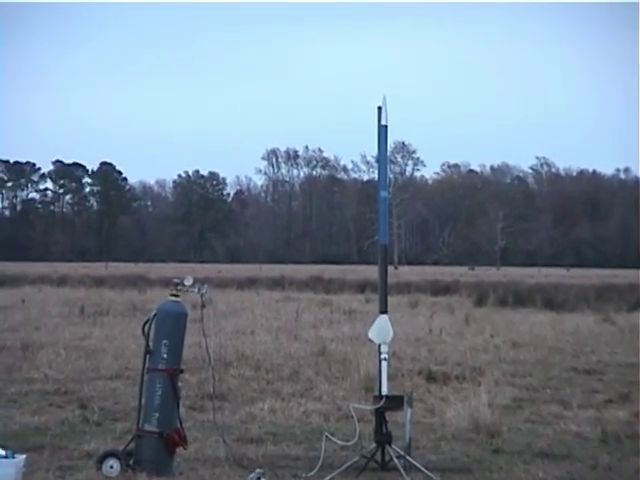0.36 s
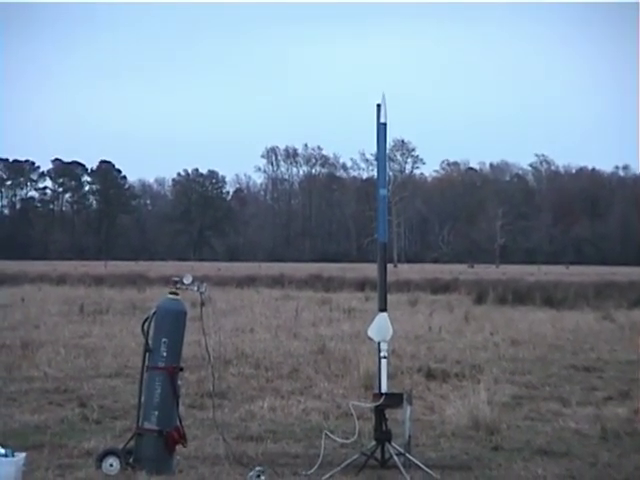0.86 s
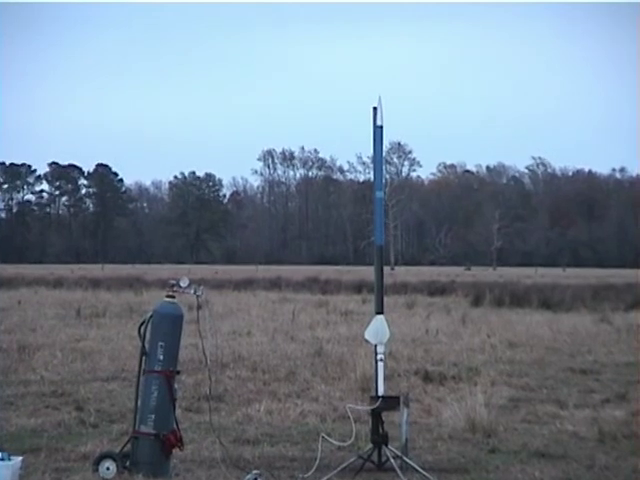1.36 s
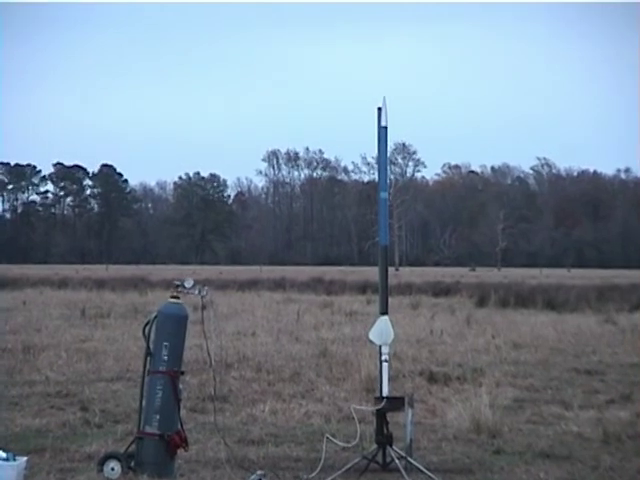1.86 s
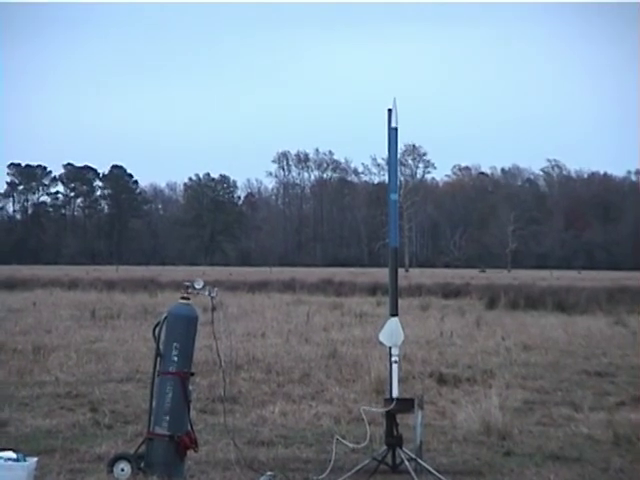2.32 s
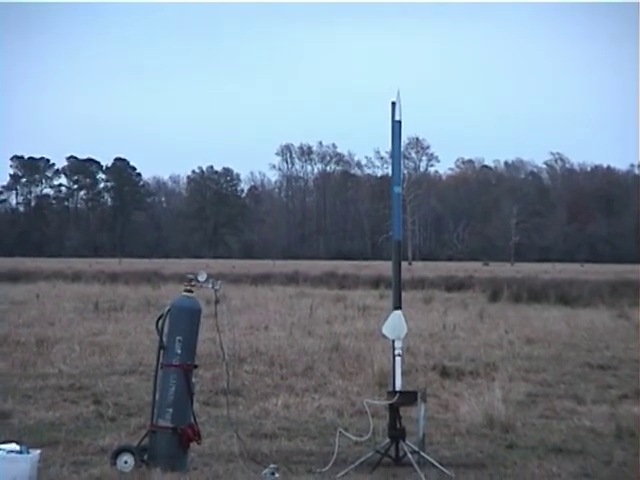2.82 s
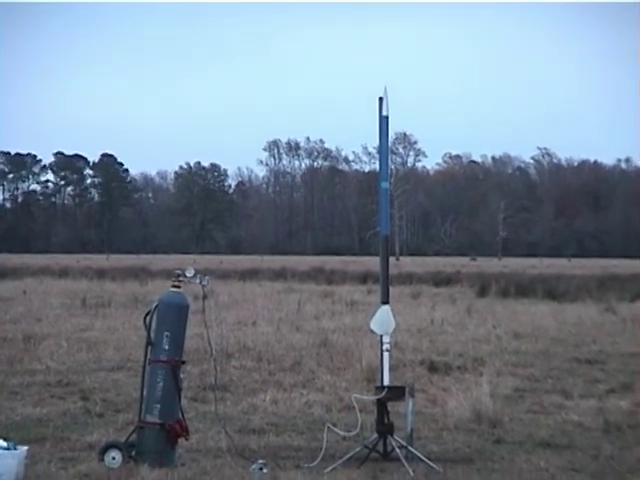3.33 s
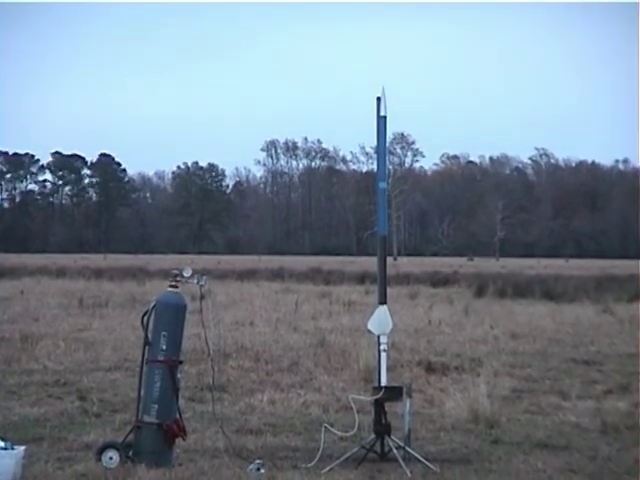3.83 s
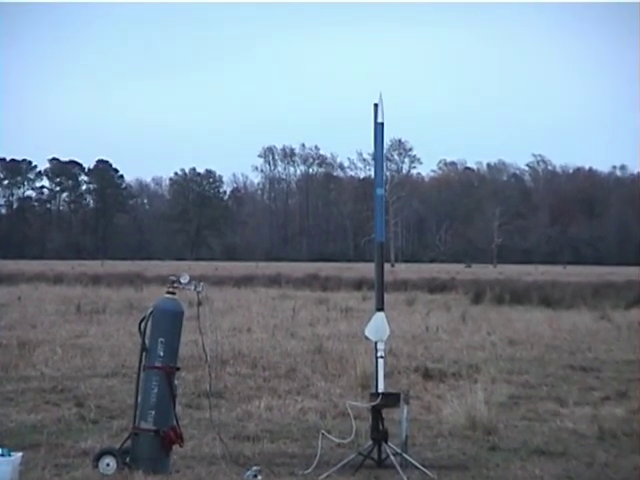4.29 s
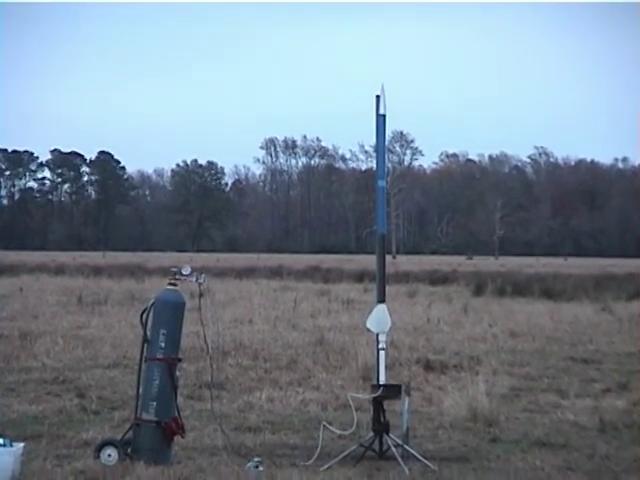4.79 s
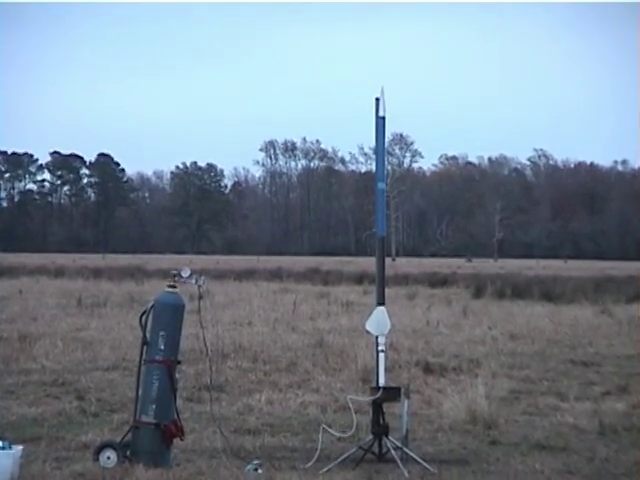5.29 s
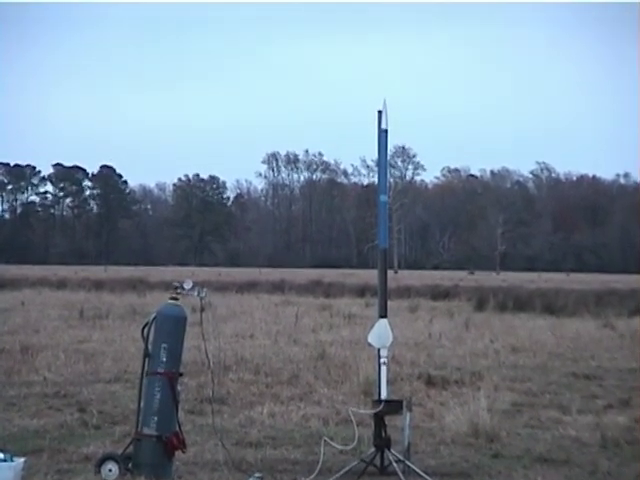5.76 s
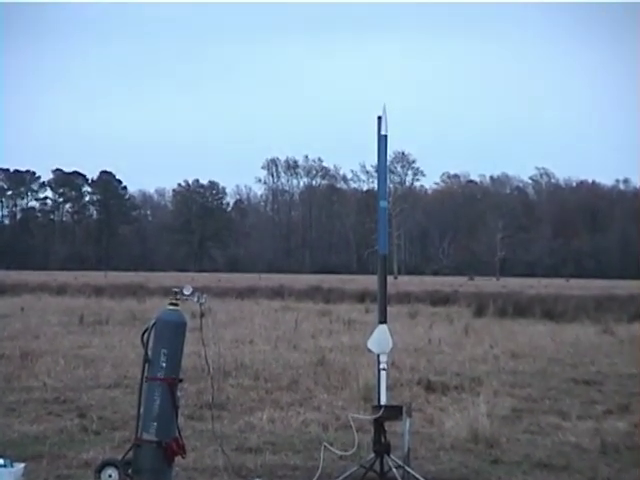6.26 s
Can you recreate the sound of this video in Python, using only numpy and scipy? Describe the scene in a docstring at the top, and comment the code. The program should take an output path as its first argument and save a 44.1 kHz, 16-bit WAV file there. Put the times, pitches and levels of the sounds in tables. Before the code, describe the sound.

From 0 s a steady, bright hiss of gas venting fills an open field, airy and concentrated in the high treble, with little echo. Beneath it lie low outdoor rumble, a faint distant hum and the camera's constant motor whirr and thin whine. A soft wind puff bumps the microphone around 0.7 s, with lesser ones later. From about 1.4 s a resonant sheen gathers at the top of the hiss and narrows. A small creak sounds at 1.9 s, then a cluster of short dull clicks from 2.7 to 3.2 s, strongest near 3 s. A trembling, extremely high whistle emerges from 2.6 s, swells to its peak near 4.2 s, then steadies, fades partly and slides slowly lower. The hiss dips slightly midway and strengthens through the end at 6.4 s, where faint creaks and a wind puff return.

```python
"""Gas vents from a thin rocket being filled in an open field, over low rumble, a faint hum and light wind.
Camera motor whine and whirr run throughout, as filtered noise and sines; its body creaks as decaying modes.
The jet hiss is shaped noise. A vent resonance slides down from 14.8 kHz, narrowing around 2.8 s;
a trembling whistle swells out of it from 2.6 s, peaks near 4.2 s and goes on falling in pitch."""
import sys
import numpy as np
from scipy import signal
from scipy.fft import rfft, irfft, next_fast_len
from scipy.io import wavfile
from scipy.ndimage import uniform_filter1d, map_coordinates

SR = 44100
rng = np.random.default_rng(int(sys.argv[2]) if len(sys.argv) > 2 else 0)


def invert_db(x):
    """Field ratio 10**(x/20) for x, a level in decibels (scalar or array-like)."""
    u = np.asarray(x, float) / 20
    return 10 ** u


def wrap_up_sound(samples):
    """Save the sound to the file named by the first command line argument, as 16-bit audio."""
    columns = np.atleast_2d(samples).T
    # keep every value between -1 and 1, then stretch to whole-number steps
    tamed = np.clip(columns, -1, 1)
    steps = np.round(tamed * 32767).astype(np.int16)
    wavfile.write(sys.argv[1], SR, steps)


N = 281881
PORTS = np.array([[1], [-1]])  # left and right microphone port in opposite polarity


def along(points, hz):
    """Reads (Hz, value) points on a log frequency axis."""
    f, v = np.transpose(points)
    return np.interp(np.log(hz + 1), np.log(f + 1), v)


def change(t, middle_s, span_s, before, after):
    """A smooth (logistic) passage from one value to another."""
    return before + (after - before) / (1 + np.exp((middle_s - t) / span_s))


def wobble(knots_per_s):
    """A smooth random curve through normally distributed knots."""
    knots = rng.standard_normal(int(N * knots_per_s / SR) + 4)
    return map_coordinates(knots, [np.arange(N) * knots_per_s / SR])


def noise(gain, patchy_db, size=1024):
    """Noise of density gain(Hz, s) per root Hz, in random patches of time and frequency."""
    hz, s, z = signal.stft(rng.standard_normal(N + size), SR, nperseg=size)
    field = uniform_filter1d(rng.standard_normal(z.shape), 9, 0)
    field = uniform_filter1d(field, 8, 1)
    z = z * invert_db(patchy_db * field / field.std())
    z = z * gain(hz[:, None], s[None]) * np.sqrt(SR / 2)
    return signal.istft(z, SR, nperseg=size)[1][:N]


def bell(hz, centre_hz, width_hz):
    """Resonance curve: 1 at its centre, 1/2 at half the width to either side."""
    return 1 / (1 + (2 * (hz - centre_hz) / width_hz) ** 2)


def dip(hz, centre_hz, width_hz, depth_db):
    """Gain of a cancellation of the given depth."""
    return invert_db(depth_db * bell(hz, centre_hz, width_hz))


def rumble():
    """Low outdoor rumble common to both ports, with a faint wavering hum from far off."""
    # rumble density: (frequency [Hz], level [dB per Hz])
    rumble_density = [(25, -100), (60, -76.5), (115, -75.5), (200, -86.5), (265, -85.5), (390, -91),
                      (530, -92.5), (780, -84.5), (1050, -86), (1180, -92.5), (1480, -83.5), (1720, -99.5),
                      (2100, -85), (3000, -105)]
    low = noise(lambda hz, t: invert_db(along(rumble_density, hz)), patchy_db=.4, size=4096)
    hum = noise(lambda hz, t: bell(hz, 350.4, 7.9), patchy_db=-1.5, size=16384)
    low += hum / hum.std() * invert_db(-75)
    return low * invert_db([[-.4], [.4]])


def wind():
    """Puffs of wind push the two ports mostly in opposite ways, with a smaller part pushing both alike."""
    # spectral shape of wind, before scaling: (frequency [Hz], level [dB])
    wind_shape = [(15, -30), (30, 0), (55, -2), (90, -22), (160, -19), (400, -38)]
    # puffs of wind: (middle [s], length [s], level [dB])
    puffs = [(.2, .5, -59), (0.673, 0.31, -48), (1.85, .15, -50), (2.8, .7, -53), (3.45, .6, -57),
             (4.05, 0.55, -53), (4.65, .2, -59), (6.018, .3, -60), (6.334, .2, -51)]
    calm_db = -65.5
    t = np.arange(N) / SR
    gust = noise(lambda hz, t: invert_db(along(wind_shape, hz)), patchy_db=2.5, size=4096)
    own = noise(lambda hz, t: invert_db(along(wind_shape, hz)), patchy_db=2.5, size=4096)
    gust = gust + 0.26 * PORTS * own
    strength = invert_db(calm_db)
    for middle_s, length_s, level_db in puffs:
        strength = strength + invert_db(level_db) * np.exp(-(2 * (t - middle_s) / length_s) ** 2)
    gust *= strength * invert_db(3.7 * wobble(8.5)) / gust.std()
    return gust * invert_db([[.6], [-.6]]) * PORTS


def whirr():
    """Camera mechanism noise: it shakes the capsules against each other."""
    # whirr density: (frequency [Hz], level [dB per Hz])
    whirr_density = [(25, -100), (70, -91), (200, -85.5), (500, -86), (700, -88), (1000, -84.5),
                     (1250, -93), (1500, -84), (1800, -108), (2500, -99), (4000, -110)]
    shake = noise(lambda hz, t: invert_db(along(whirr_density, hz)), patchy_db=0.7, size=4096)
    return PORTS * invert_db([[-.8], [.8]]) * shake


def whine():
    """Camera motor and gear tones: nearly steady sines sharing one slow phase flutter."""
    # tones: (frequency [Hz], left level [dB rms], right level [dB rms], left lead [rad])
    tones = [(367.4, -77, -75, 2.5), (562.1, -60.5, -70, 3.1), (600.3, -72, -82, -2.0),
             (925.8, -73, -75, -2.4), (1022.7, -75, -76, -2.5), (1038.7, -72, -71, -2.7),
             (1070.5, -69, -65, -2.7), (1086.4, -70, -64, -2.9), (1118.5, -78, -72, -2.4),
             (1124.0, -75, -74, -2.4), (1134.5, -74, -72, -2.4), (1348.7, -76, -80, -2.7),
             (1426.7, -75, -74, -2.6), (1472.2, -77, -77, -2.9), (1498.3, -69, -68, -3.0),
             (1528.6, -68, -68, -2.7), (1648.5, -78, -80, -0.6), (1798.2, -84, -75, -1.7)]
    t = np.arange(N) / SR
    out = np.zeros((2, N))
    flutter_rad = .15 * wobble(2)
    for hz, left_db, right_db, lead_rad in tones:
        phase = 2 * np.pi * (hz * t + rng.random()) + flutter_rad
        out += np.sqrt(2) * invert_db([[left_db], [right_db]]) * np.sin(phase + [[lead_rad], [0]])
    return out


def creaks():
    """Camera body creaks: decaying modes that move the two capsules nearly against each other."""
    # creaks: (start [s], level [dB], left over right [dB], ring pitch [Hz])
    creak_events = [(1.880, -33, -4, 1000), (2.689, -33, 1, 744), (2.708, -40, -3, 960),
                    (2.722, -39, 0, 920), (2.735, -36, -2, 900), (2.979, -27.5, 3, 870),
                    (3.0615, -29, 6, 780), (3.240, -38, -3, 900), (3.722, -41, 2, 815),
                    (6.285, -44, 6, 790), (6.328, -45, 4, 740), (6.362, -42, 0, 774)]
    # body modes, before random level spread: (multiple of ring pitch [-], level [dB], right lead [rad])
    body_modes = [(.43, -6, 1.8), (.68, -4, 3), (1, 2.5, 2.1), (1.2, -7, 3), (1.75, -8, 3)]
    decay_cycles = 22  # cycles of the ring pitch until 60 dB down
    u = np.arange(SR // 10) / SR
    out = np.zeros((2, N))
    for start_s, level_db, pan_db, ring_hz in creak_events:
        ring = np.zeros((2, len(u)))
        for multiple, mode_db, lead_rad in body_modes:
            mode_gain = invert_db(mode_db + rng.normal(0, 1.0))
            ring += mode_gain * np.sin(2 * np.pi * multiple * ring_hz * u + [[0], [lead_rad]])
        decay_db = 60 * u * ring_hz / decay_cycles
        onset = 1 - np.exp(-u / 0.0026)
        ring *= invert_db(level_db + PORTS * pan_db / 2 - decay_db) * onset
        part = out[:, round(start_s * SR):][:, :len(u)]
        part += ring[:, :part.shape[1]]
    return out


def path(hz):
    """Cancellations on the way from vent to microphone."""
    # cancellations: (centre [Hz], width [Hz], depth [dB])
    cancellations = [(2760, 150, -4), (4380, 250, -12), (5930, 220, -17), (6550, 330, -7), (7400, 350, -3),
                     (8280, 600, -7), (13010, 600, -18.5), (15230, 420, -9)]
    return np.prod([dip(hz, *row) for row in cancellations], axis=0)


def vent_dip(hz, t):
    """Anti-resonance of the vent: it moves down, narrows and fills in."""
    centre_hz, width_hz, depth_db = [change(t, 4.3, 0.82, before, after)
                                     for before, after in ((10690, 10490), (800, 520), (-16, -10))]
    return dip(hz, centre_hz, width_hz, depth_db)


def jet(hz, t, density):
    """Broad turbulence; a mode below the anti-resonance grows as the tank fills and the gas column retunes."""
    # flow through the vent: (time [s], jet level [dB])
    flow = [(0, 0.9), (1.6, 0.8), (2.6, -.5), (3.7, -.5), (4.3, 0.36), (6.4, 1.56)]
    lower_mode_db = change(t, 3.4, 0.33, 1, 7)
    flow_db = np.interp(t, *np.transpose(flow))
    return invert_db(along(density, hz) + flow_db + lower_mode_db * bell(hz, 10380, 3200))


def ringing(hz, t):
    """Turbulence ringing in the vent: a resonance that slides down and narrows."""
    # sliding resonance before path dips: (time [s], centre [Hz], peak level [dB per Hz])
    resonance = [(0, 14800, -90), (.7, 14500, -89), (1.4, 13250, -70), (2.2, 13150, -63.5),
                 (2.9, 12860, -59.5), (3.3, 12600, -56), (4.2, 11550, -59.5), (4.9, 11300, -60.5),
                 (6.4, 10610, -70)]
    s, centre_hz, peak_db = np.transpose(resonance)
    width_hz = change(t, 2.8, 0.55, 2500, 860)
    shape = bell(hz, np.interp(t, s, centre_hz), width_hz) ** 0.87
    return invert_db(np.interp(t, s, peak_db)) * shape * path(hz)


def scatter():
    """Hiss and ringing scattered by the field, opposite in the two ports."""
    # scattered hiss density before flow and lower mode: (frequency [Hz], level [dB per Hz])
    scatter_density = [(1500, -100.5), (2500, -92), (3500, -102), (4200, -93.5), (5400, -101), (5900, -95),
                       (6600, -99), (7200, -99), (9000, -93), (10100, -94), (12000, -88.5), (14000, -84),
                       (15200, -93), (15700, -86)]
    hiss = noise(lambda hz, t: jet(hz, t, scatter_density), patchy_db=4.5)
    ring = noise(ringing, patchy_db=6.0)
    return PORTS * (hiss + invert_db(-20.5) * ring)


def vent():
    """Jet turbulence and its ringing, heard directly through the path and vent dips."""
    # jet density before dips, flow and lower mode: (frequency [Hz], level [dB per Hz])
    jet_density = [(1500, -100), (2000, -92.5), (2500, -79.5), (2850, -87.5), (4000, -86.5), (4950, -74),
                   (5400, -79), (7100, -73), (9500, -73.5), (12000, -70), (13950, -65.5), (14900, -78.5),
                   (15600, -75), (16500, -73)]
    hiss = noise(lambda hz, t: jet(hz, t, jet_density) * path(hz) * vent_dip(hz, t), patchy_db=-0.02)
    ring = noise(lambda hz, t: ringing(hz, t) * vent_dip(hz, t), patchy_db=.5)
    return hiss * invert_db([[-.2], [.2]]) + ring * invert_db([[-.5], [.5]])


def whistle():
    """The vent locks into self-oscillation: one tone trembling in pitch and size, steadier as it falls."""
    # whistle before tremble and port balance: (time [s], pitch [Hz], level [dB rms])
    whistle_course = [(2.6, 12170, -53), (3, 12160, -39), (3.4, 11970, -38), (3.75, 11650, -30),
                      (4.2, 11410, -25), (4.5, 11295, -27.5), (4.75, 11195, -27.5), (5.1, 11010, -32),
                      (6, 10800, -36.5), (6.4, 10670, -33.5)]
    tremble_extra_hz, halves_s, tremble_least_hz = 378.4, .68, 33.84  # the extra dies away from the second point
    t = np.arange(N) / SR
    s, pitch_hz, level_db = np.transpose(whistle_course)
    tremble_hz = tremble_least_hz + tremble_extra_hz * 2 ** (-np.maximum(t - s[1], 0) / halves_s)
    eddies = 1.9 * np.tanh(wobble(450) / 1.9)
    # the pitch flares upward more than it sags
    drift_hz = tremble_hz * (eddies + .35 * (eddies ** 2 - .6) + .15 * wobble(14))
    size = invert_db(np.interp(t, s, level_db) + 0.25 * wobble(300) + 0.8 * wobble(12))
    phase = 2 * np.pi * np.cumsum(np.interp(t, s, pitch_hz) + drift_hz) / SR
    tone = np.sqrt(2) * size * np.sin(phase + [[0], [.2]])  # slight lead at the right port
    return tone * invert_db([[-1.2], [1.2]])


def scene():
    """Field, camera and vent together."""
    field = rumble() + wind()
    camera = whirr() + whine() + creaks()
    return field + camera + scatter() + vent() + whistle()


def roll_off(x):
    """The treble ends steeply here."""
    return signal.sosfilt(signal.butter(12, 16070, fs=SR, output="sos"), x)


def record(dry):
    """The camera's band limit: a sharp cut of the treble."""
    top_hz = 15760
    m = next_fast_len(N)
    spectrum = rfft(dry, m) * (np.fft.rfftfreq(m, 1 / SR) < top_hz)
    mix = irfft(spectrum, m)[:, :N]
    return roll_off(mix)


dry = scene()
out = record(dry)
wrap_up_sound(out)
```